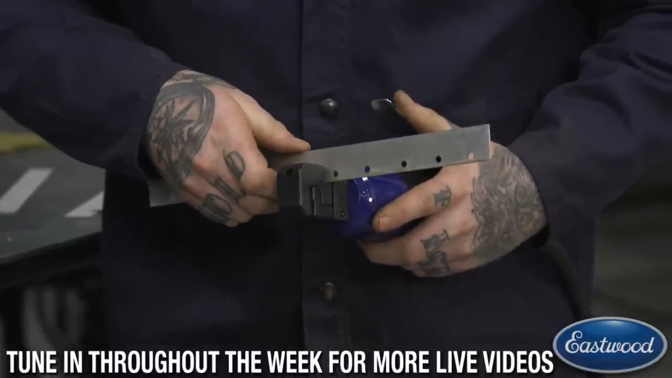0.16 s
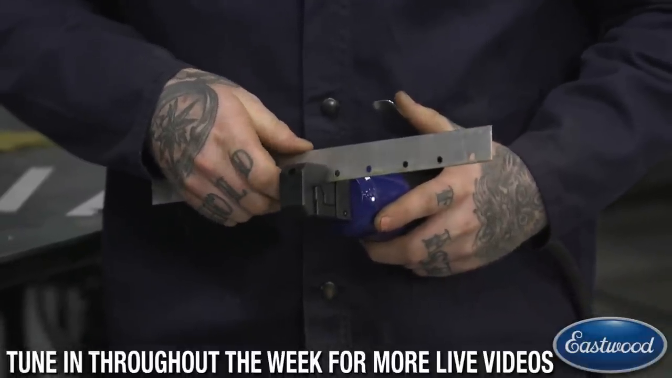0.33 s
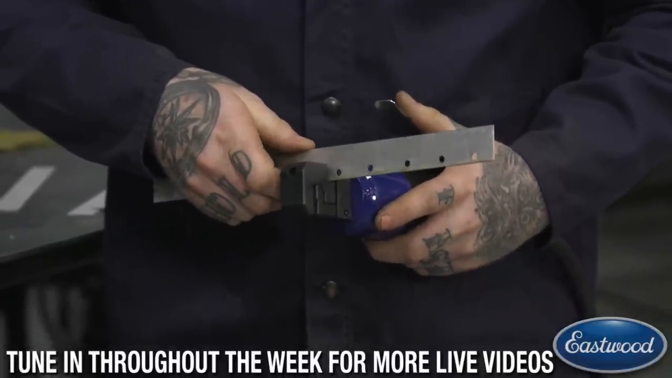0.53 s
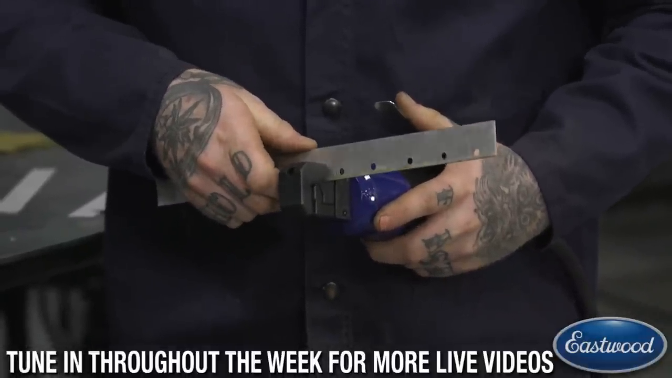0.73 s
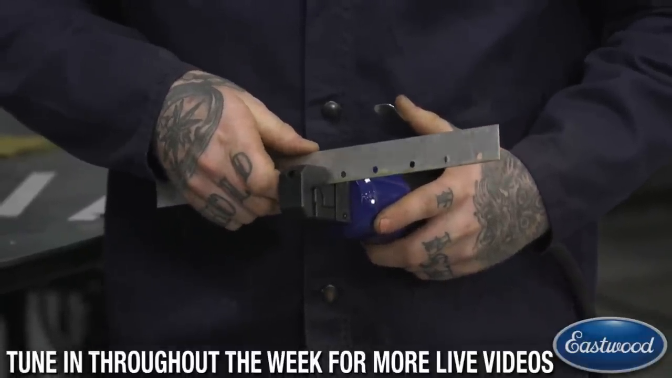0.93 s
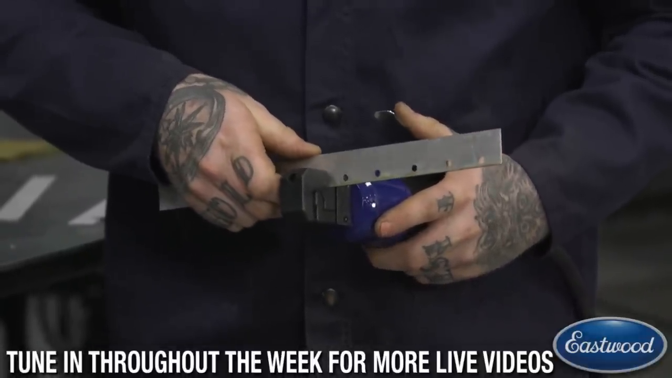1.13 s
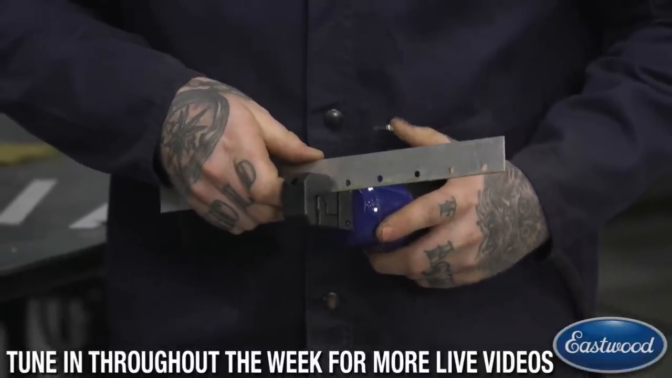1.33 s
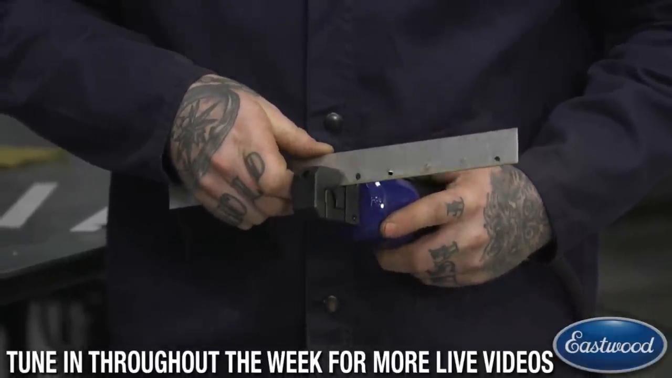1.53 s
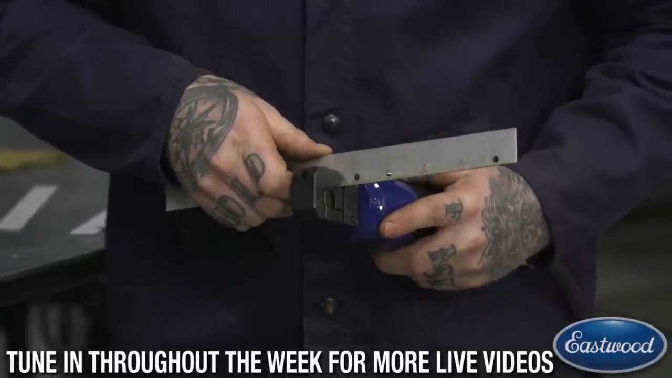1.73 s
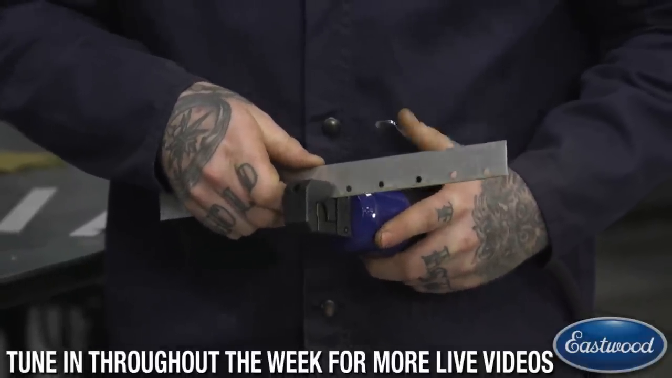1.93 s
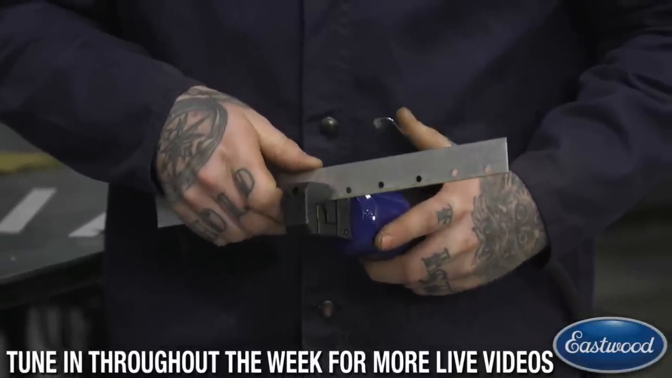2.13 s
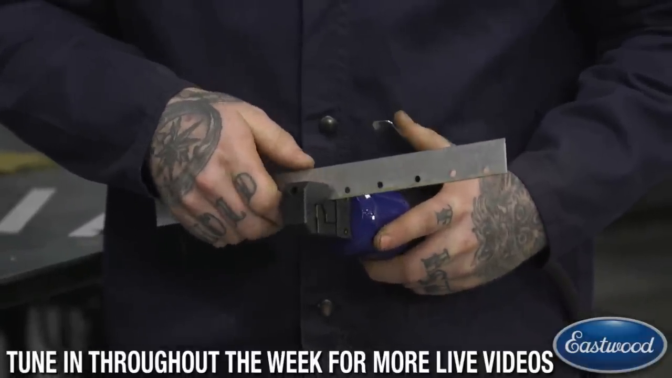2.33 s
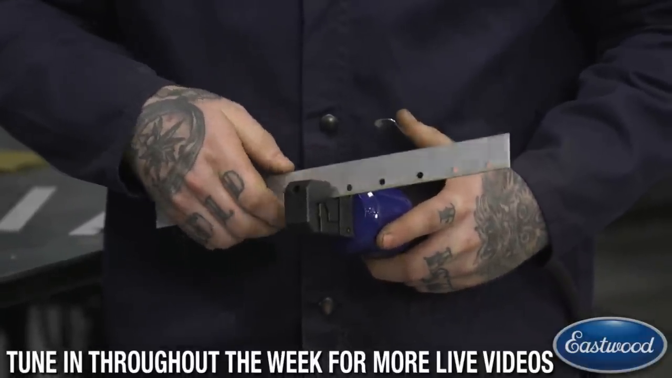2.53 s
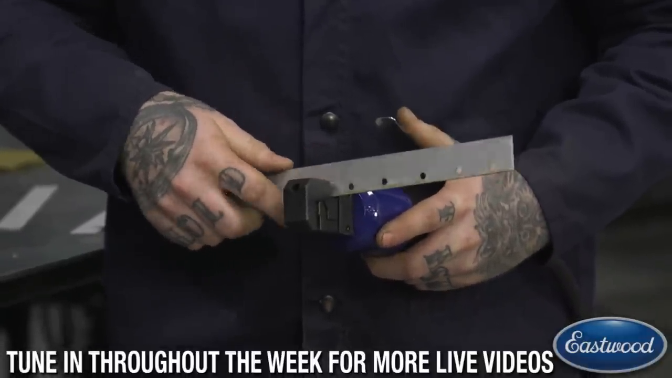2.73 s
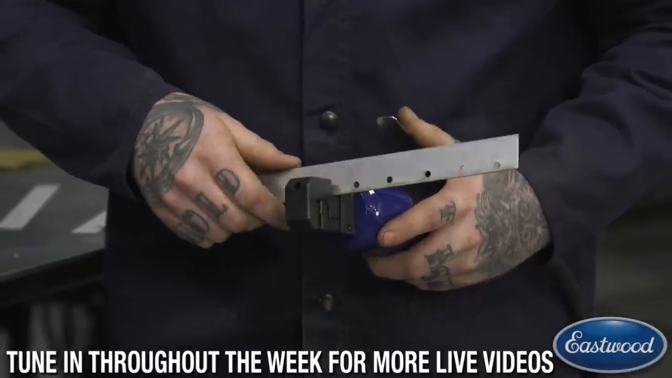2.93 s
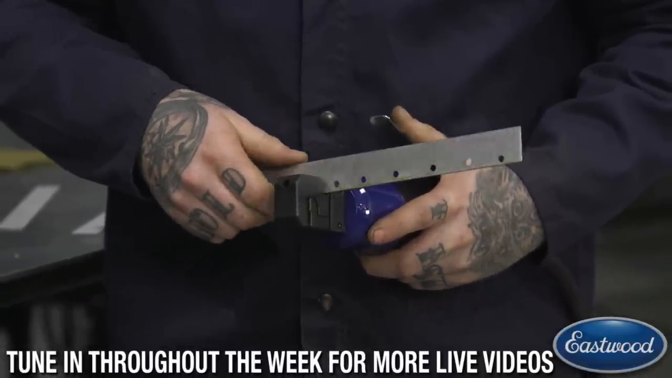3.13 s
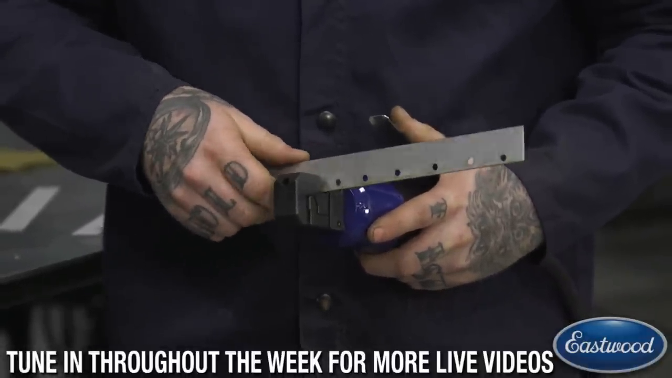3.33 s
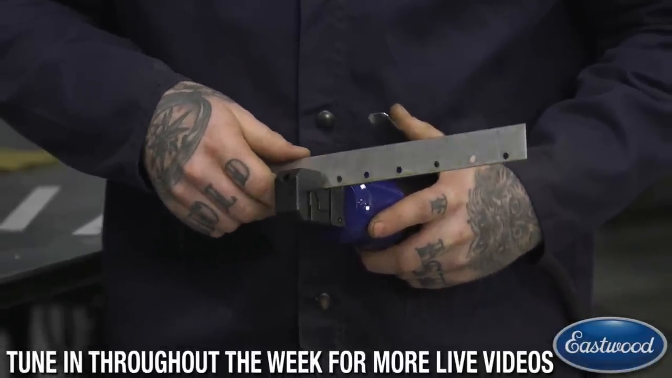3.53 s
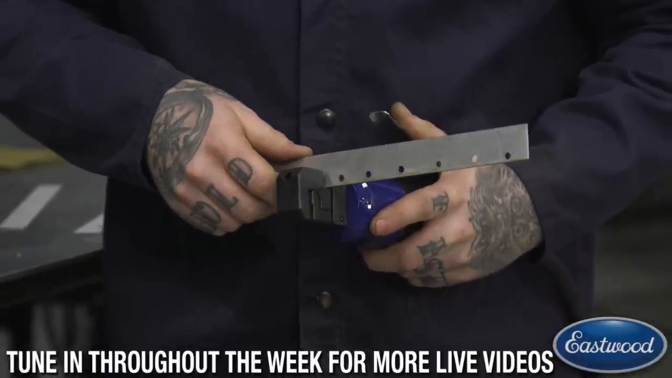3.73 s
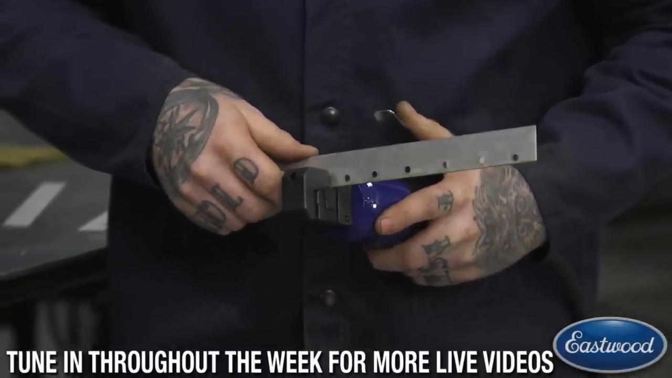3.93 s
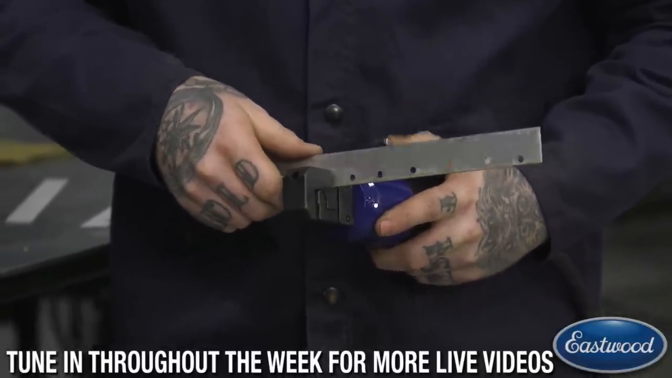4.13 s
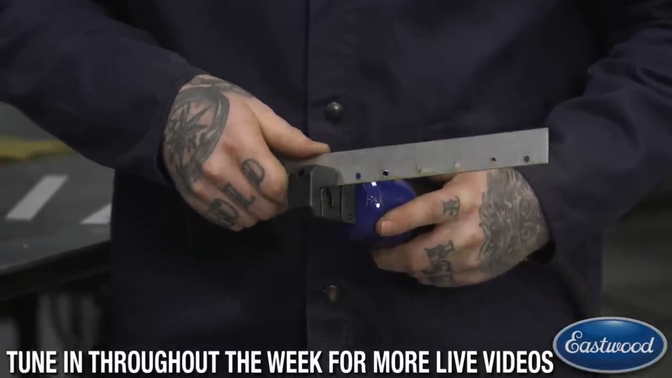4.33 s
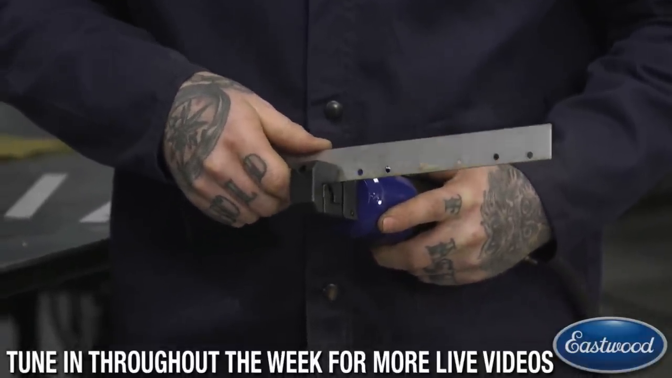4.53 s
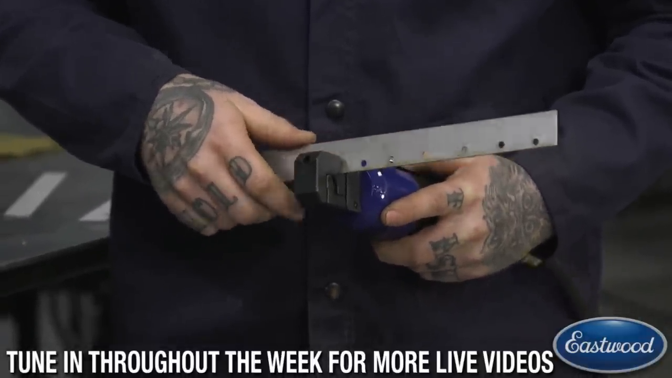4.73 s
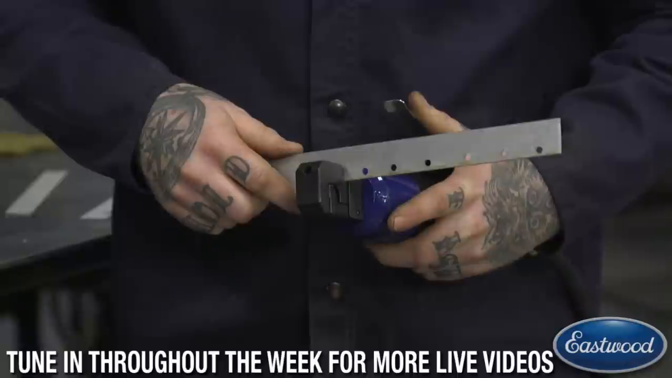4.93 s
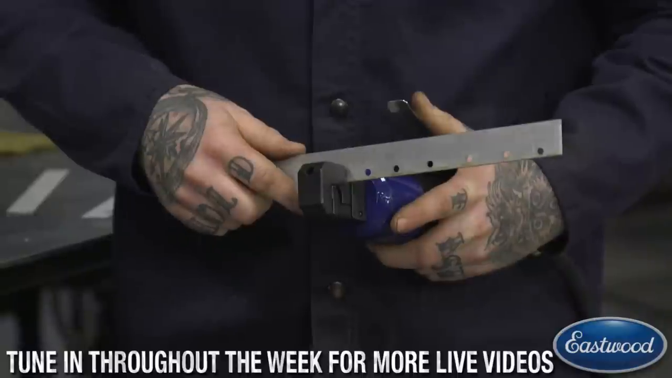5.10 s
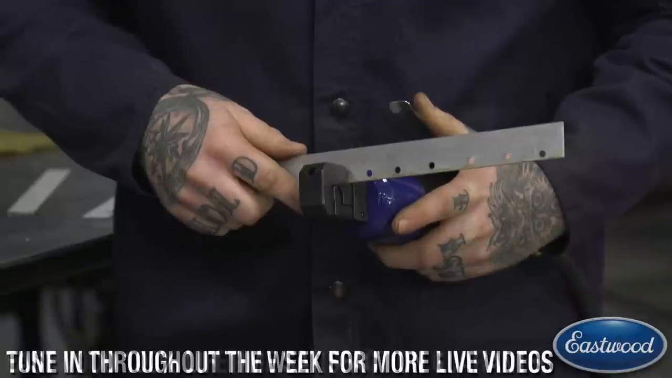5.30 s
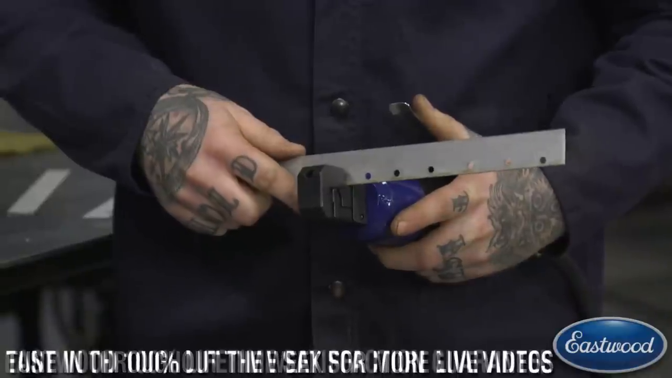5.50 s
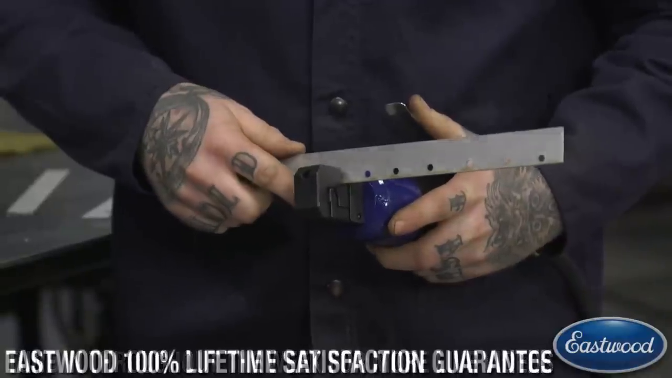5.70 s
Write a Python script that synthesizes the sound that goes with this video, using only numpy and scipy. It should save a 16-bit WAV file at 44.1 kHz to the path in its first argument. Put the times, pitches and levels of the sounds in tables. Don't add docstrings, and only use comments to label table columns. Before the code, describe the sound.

A quiet shop hums at first. A hand-held air punch chatters and cracks through steel, then releases a sharp blast of air that thins into a whistling hiss. Small tinny clicks follow as the metal strip is moved. A second rush and snap comes, faint trigger squeaks, another blow-off, and a last tiny tick, all heard close, with faint room reflections.

```python
import sys
import numpy as np
from scipy import signal
from scipy.fft import rfft, irfft, next_fast_len
from scipy.io import wavfile
from scipy.ndimage import map_coordinates

SR = 44100
rng = np.random.default_rng(int(sys.argv[2]) if len(sys.argv) > 2 else 0)


def inscribe(sig):
    pcm = np.round(np.clip(np.atleast_2d(sig).T, -1, 1) * 32767)
    wavfile.write(sys.argv[1], SR, pcm.astype(np.int16))


def magnitude_from_level(level_db):
    exponent = np.asarray(level_db, float) / 20
    return 10 ** exponent


N = 254012


def since(s):
    return np.arange(N) / SR - s


def past(t, knee_s):
    return knee_s * np.logaddexp(0, t / knee_s)


def unit(x):
    return x / np.sqrt(np.mean(x ** 2) + 1e-20)


def along(points, hz):
    f, v = np.transpose(points)
    return np.interp(np.log(hz + 1), np.log(f + 1), v)


def wobble(rate):
    knots = rng.standard_normal(int(N * rate / SR) + 4)
    return map_coordinates(knots, [np.arange(N) * rate / SR])


def filtered(x, response):
    m = next_fast_len(N + SR // 2)
    return irfft(rfft(x, m) * response(np.fft.rfftfreq(m, 1 / SR)), m)[..., :N]


def resonances(modes):
    def response(f):
        total = 0
        for k, (centre, width, db) in enumerate(modes):
            total = total + (-1) ** k * magnitude_from_level(db) * 1j * f * width / (centre * centre - f * f + 1j * f * width)
        return total
    return response


def air(spectrum, eddy_db):
    eddies = magnitude_from_level(eddy_db * (wobble(300) + wobble(1500)))
    return unit(filtered(eddies * rng.standard_normal(N), lambda hz: magnitude_from_level(along(spectrum, hz))))


def bursts(events, crack):
    out, t = np.zeros((2, N + SR)), np.arange(SR // 5) / SR
    for s, db, second_db, t60 in events:
        wake = magnitude_from_level(-60 * t / max(t60, .002)) * rng.standard_normal((2, len(t)))
        wake[:, 0] = 1.5
        sharp_start = 1 + crack * magnitude_from_level(-60 * t / .0015)
        level = magnitude_from_level(db + np.array([[0], [second_db]]))
        out[:, round(s * SR):][:, :len(t)] += level * sharp_start * wake
    return out[:, :N]


# f/Hz, level/dB per Hz
VENTILATION = [(12, -40.5), (20, -11.5), (145, -12), (270, -2.5), (307, -5), (337, -1), (362, -18),
               (390, -7), (523, -12.5), (652, -6), (940, -13.5), (1170, -13.5), (1600, -32.5),
               (2080, -57.5), (3520, -120)]
# f/Hz, level/dB per Hz
AIR_LINES = [(1000, -28.5), (1400, -2.5), (1600, -4.5), (2250, -2.5), (2600, -7), (3100, -7), (3700, -4),
             (4700, -6.5), (5600, -13), (7300, -15.5), (9500, -17.5), (11000, -15.5), (12200, -20),
             (15700, -30.5)]
# f/Hz, level/dB rms
FAN_MOTOR = [(333.8, -63.5), (667.5, -62.5), (1001, -68), (1147, -68.5), (1335, -76.5), (1669, -82.5)]
VENTILATION_DB, AIR_LINES_DB = -54 - 2.0, -67


def shop():
    t = since(0)
    motor = np.zeros(N)
    for hz, db in FAN_MOTOR:
        level = magnitude_from_level(db + 3 + 0.35 * wobble(12))
        motor += level * np.sin(2 * np.pi * hz * t + .15 * wobble(8.1))
    rumble = magnitude_from_level(VENTILATION_DB + 0.8 * wobble(3)) * air(VENTILATION, eddy_db=0.0)
    far_hiss = magnitude_from_level(AIR_LINES_DB + 0.34 * wobble(2.5)) * air(AIR_LINES, eddy_db=0.25)
    return rumble + far_hiss + motor


# f/Hz, t60/s
ROOM_DECAY = [(200, 0.403), (2000, 0.57), (8000, 0.31), (16000, 0.23)]


def walls(x):
    hz, t, z = signal.stft(rng.standard_normal(SR // 2), SR, nperseg=256)
    decay = magnitude_from_level(-60 * t / along(ROOM_DECAY, hz)[:, None])
    tail = signal.istft(z * decay, SR, nperseg=256)[1]
    return signal.fftconvolve(np.pad(x, (400, 0)), tail / np.linalg.norm(tail))[:N]


# t/s, peak level/dB, crack above ring/dB, t60/s
STRIP_TICKS = [
    (2.438, -46, 1, .06),
    (2.4435, -46, -6, 0.057),
    (2.449, -47, 2, 0.035),
    (2.563, -54.5, 1, .035),
    (2.76, -72, 8, .02),
    (2.985, -66, 8, 0.022),
    (3.4176, -63, 12.5, .03),
    (5.53, -60, 16, 0.0182),
]
# f/Hz, width/Hz, level/dB
LOOSE_STRIP = [(2040, 270, -1.5), (4810, 110, -9), (6680, 160, -4), (7495, 90, -1), (9500, 170, -5),
               (10560, 130, -1), (12800, 310, -5), (13800, 120, -5), (14900, 130, -13)]
# f/Hz, width/Hz, level/dB
LIGHT_CONTACT = [(3820, 1400, 0.5), (8000, 4000, -2), (12500, 3000, -12)]
# t/s, length/s, f/Hz, level/dB
TRIGGER_SQUEAKS = [
    (4.62, 0.0543, 8000, -76),
    (4.645, .045, 9254, -78.5),
    (4.662, .03, 13570, -86),
    (4.68, .045, 8650, -78),
    (4.721, .04, 13550, -85),
]


def handling():
    ring, crack = bursts(STRIP_TICKS, crack=1.3)
    tinks = magnitude_from_level(7.0) * filtered(ring, resonances(LOOSE_STRIP))
    out = tinks + magnitude_from_level(-4) * filtered(crack, resonances(LIGHT_CONTACT))
    t, waver_db, drift = since(0), 3 * wobble(60), .8 * wobble(120)
    for s, length, hz, db in TRIGGER_SQUEAKS:
        swell = np.sin(np.pi * np.clip((t - s) / length, 0, 1))
        out = out + magnitude_from_level(db + waver_db) * swell * np.sin(2 * np.pi * hz * t + drift)
    return out


# port opens t/s, peak level/dB, hold/s, choked until/s, seep level/dB
BLOW_OFFS = [
    (1.865, -13, 0.0058, 0.14, -52),
    (4.8198, -15.5, 0.0234, 0.14, -56),
]
# f/Hz, width/Hz, level/dB
PORT_FLOWING = [(2170, 316, -1.5), (4200, 680, -3.5)]
# f/Hz, width/Hz, level/dB
PORT_NEARLY_EMPTY = [(2200, 240, 2), (4380, 506, 0)]
# f/Hz, width/Hz, level/dB
MUFFLER_MODES = [(3720, 1700, -2.5), (5660, 1160, 2), (7240, 1140, 1), (9860, 1460, -1),
                 (12040, 1520, -3.5), (15100, 820, -6.5)]
# f/Hz, width/Hz, level/dB
FLAP_GAP = [(12420, 1320, 0), (7920, 500, -3.5)]
GAP_DB, GAP_FADE_DB_S = -12, 85
SEEP_FROM_S, SEEP_PEAK_S, SEEP_RISE_DB_S, SEEP_FADE_DB_S = .165, 0.24, 50, 48
HISS_DB, HISS_SAG_DB_S, SHUT_S, SHUT_LASTS_S, SHUT_DB = -53, 54, .32, 0.073, -8


def seep():
    breath = rng.standard_normal((2, N))
    whistle, hiss, gap = np.zeros((3, N))
    for s, *_, seep_db in BLOW_OFFS:
        t = since(s + SEEP_PEAK_S)
        flowing = t >= SEEP_FROM_S - SEEP_PEAK_S
        whistle += magnitude_from_level(seep_db + np.where(t < 0, SEEP_RISE_DB_S, -SEEP_FADE_DB_S) * t) * flowing
        spare_db = seep_db - HISS_DB
        shut = np.clip((since(s) - SHUT_S) / SHUT_LASTS_S, 0, 1)
        hiss += magnitude_from_level(HISS_DB - HISS_SAG_DB_S * np.abs(t) + (SHUT_DB + spare_db) * shut) * flowing
        gap += magnitude_from_level(seep_db + spare_db + GAP_DB - GAP_FADE_DB_S * t) * flowing

    def sung(noise, modes, sharpness):
        return unit(filtered(noise, lambda f: resonances(modes)(f) ** sharpness))

    late = np.clip((-54 - 20 * np.log10(whistle + 1e-9)) / 9, 0, 1)
    port = (1 - late) * sung(breath[0], PORT_FLOWING, 1.6) + late * sung(breath[0], PORT_NEARLY_EMPTY, 1.6)
    gap_air = gap * sung(breath[0], FLAP_GAP, 2)
    return whistle * port + gap_air + hiss * sung(breath[1], MUFFLER_MODES, 2)


# f/Hz, level/dB per Hz
INLET_HISS = [(710, -38), (1200, -16.5), (2130, -2), (2730, -10), (4410, -6.5), (6370, -7), (7100, 0.5),
              (7740, -5), (10600, -1), (16000, -15)]
# f/Hz, level/dB per Hz
BODY_ROAR = [(15, -46.5), (25, -11.5), (195, -1.5), (338, -5.5), (769, -3), (1030, -12), (1120, -5),
             (1500, -12.5), (1950, -38), (3300, -120)]
# f/Hz, level/dB per Hz
FULL_CYLINDER_HISS = [(470, -34.5), (800, -2), (1300, -4), (1530, -11), (1750, -3.5), (2310, -5),
                      (2490, 0.5), (2710, -4), (3660, -4.5), (5250, -7), (7160, -4.5), (9540, -7.5),
                      (13700, -13.5), (15700, -21)]
# valve opens t/s, slug shears t/s, air level/dB, steel level/dB, strip tuning/ratio
PUNCH_STROKES = [
    (1.3635, 1.392, -26, -14.5, 1.0),
    (4.1198, 4.149, -27.5, -13.5, 1.015),
]
# t/s after the valve opens, level/dB
INLET_FLOW = [
    (0, -11),
    (.0035, -1.5),
    (.0145, 1),
    (.0205, -5.5),
    (.0375, -3),
    (.041, -14.5),
]
BUFFET_DB, BUFFET_FADE_DB_S, FILL_FADE_DB_S = -12, 600, 1500
SETTLE_DB, SETTLE_FADE_DB_S = -14.5, 155


def inlet():
    hiss, buffet, settle = np.zeros((3, N))
    when, flow_db = np.transpose(INLET_FLOW)
    for opens, _, air_db, _, _ in PUNCH_STROKES:
        t = since(opens)
        full = np.clip(t - when[-1], 0, None)
        hiss += magnitude_from_level(air_db + np.interp(t, when, flow_db) - FILL_FADE_DB_S * full) * (t >= 0)
        buffet += magnitude_from_level(air_db + BUFFET_DB - BUFFET_FADE_DB_S * full) * (t >= 0)
        settle += magnitude_from_level(air_db + SETTLE_DB - SETTLE_FADE_DB_S * full) * (t >= when[-2])
    moving = hiss * air(INLET_HISS, eddy_db=2.5) + buffet * air(BODY_ROAR, eddy_db=3)
    return moving + settle * air(FULL_CYLINDER_HISS, eddy_db=1.1)


# f/Hz, level/dB per Hz
VALVE_LEAK = [(2350, -47), (4000, -18.5), (6070, 0), (10100, -3), (13800, -11.5), (15100, -6.5),
              (16000, -17.5)]
# f/Hz, level/dB per Hz
EXHAUST_JET = [(590, -36), (1000, -8.5), (1260, -7.5), (1690, -5), (2490, 0), (2990, -5.5), (3890, -0.5),
               (5090, -4), (5850, 0.5), (6330, -2.5), (8000, -1), (10400, -31.5), (17600, -120)]
# f/Hz, level/dB per Hz
JET_TREBLE = [(4710, -34), (8000, -6), (9450, -2), (10200, 1.5), (11500, -6), (13000, -3), (14000, -8.5),
              (15700, -13.5)]
# peak t/s, level/dB, swell/dB a second
VALVE_SPURTS = [
    (1.834, -60.5, 1500),
    (1.849, -52, 800),
    (4.778, -59.5, 2500),
    (4.796, -51.5, 2498),
]
SPURT_STOP_DB_S, SPURT_LASTS_S = 1800, 0.0044
CRACK_DB, SLIT_DB, SLIT_S, LIFT_S, OPEN_S = -32, -16.5, .006, .010, .029
CHOKED_DB_S, FREE_DB_S, KNEE_S = 104.5, 330, 0.01195
ROAR_DB, ROAR_HOLD_S, ROAR_FADE_DB_S, ROAR_LEAST_DB = -8.5, .08, 171, -22
TREBLE_DB, TREBLE_GROWS = -2, .8


def exhaust():
    leak, jet, treble, roar = np.zeros((4, N))
    for s, db, swell_db in VALVE_SPURTS:
        t = since(s)
        leak += magnitude_from_level(db + np.where(t < 0, swell_db, -SPURT_STOP_DB_S) * t) * (t < SPURT_LASTS_S)
    for s, db, hold_s, choked_s, _ in BLOW_OFFS:
        t = since(s)
        slit = magnitude_from_level(SLIT_DB) * np.clip(t / SLIT_S, 0, 1)
        lift = np.clip((t - LIFT_S) / (OPEN_S - LIFT_S), 0, 1)
        area = magnitude_from_level(CRACK_DB) + slit + lift
        opening_db = 20 * np.log10(area / area[-1])
        choked_db = opening_db - CHOKED_DB_S * np.clip(t - OPEN_S - hold_s, 0, None)
        rest = magnitude_from_level(db - FREE_DB_S * past(t - choked_s, KNEE_S)) * (t >= 0)
        roar_db = np.clip(ROAR_DB - ROAR_FADE_DB_S * (t - ROAR_HOLD_S), ROAR_LEAST_DB, ROAR_DB)
        jet += rest * magnitude_from_level(choked_db)
        treble += rest * magnitude_from_level(TREBLE_DB + TREBLE_GROWS * choked_db)
        roar += rest * magnitude_from_level(choked_db + roar_db)
    blast = jet * air(EXHAUST_JET, eddy_db=0.67) + treble * air(JET_TREBLE, eddy_db=0.2)
    return leak * air(VALVE_LEAK, eddy_db=2.1) + blast + roar * air(BODY_ROAR, eddy_db=1.05)


# t/s after the shear, level/dB, f/Hz, t60/s
BODY_RINGS = [(-.0286, -17, 240, 0.019), (-.0216, -22, 220, 0.015), (-.0148, -9, 6950, .015),
              (-.0059, -14, 6500, .018), (0, -16, 1100, 0.021), (0, 4, 2520, 0.0023),
              (.0005, -10.5, 2330, .028), (.001, -31, 2520, 0.18), (.0005, -14, 3100, 0.029),
              (.001, -24, 3485, .17), (.009, -26, 7400, .07), (0.0138, -8, 296, 0.0094),
              (0.0253, -11.5, 530, .027), (.032, -36, 12, .3), (.044, -33, 9400, 0.073)]
# t/s, peak level/dB, f/Hz, t60/s
BLAST_JOLT = (4.844, -24, 120, .066)


def thuds():
    out, t = np.zeros(N + SR), np.arange(SR // 3) / SR
    rings = [BLAST_JOLT]
    for _, shear, _, steel_db, tuning in PUNCH_STROKES:
        rings += [(shear + s, steel_db + db, hz * tuning, t60) for s, db, hz, t60 in BODY_RINGS]
    for s, db, hz, t60 in rings:
        out[round(s * SR):][:len(t)] -= magnitude_from_level(db - 60 * t / t60) * np.sin(2 * np.pi * hz * t)
    return out[:N]


# t/s after the shear, level/dB, treble above it/dB, t60/s
STEEL_CONTACTS = [
    (-.0148, -9.5, -2.5, 0.012),
    (-.0059, -9, 4, .013),
    (0, -2.5, -9, .011),
    (.0016, -3, -8, .02),
    (.0078, -14, -3, .01),
    (.0251, -21, -12, 0.011),
    (.044, -28, 3, .05),
]
# t/s, peak level/dB, treble above peak/dB, t60/s
TRIGGER_PRESS = (4.112, -48, -5, .018)
# f/Hz, width/Hz, level/dB
JAW_MODES = [(1103, 500, -5.5), (2343, 290, -0.5), (3590, 350, 0.5), (4696, 520, -2), (6000, 770, -14.5)]
# f/Hz, width/Hz, level/dB
CLAMPED_STRIP = [(7320, 500, -2.5), (9300, 890, -3), (10360, 600, -0.5), (13900, 900, -7),
                 (15300, 700, -16.5)]


def steel():
    snaps = [TRIGGER_PRESS]
    for _, shear, _, steel_db, _ in PUNCH_STROKES:
        snaps += [(shear + s, steel_db + db, treble_db, t60) for s, db, treble_db, t60 in STEEL_CONTACTS]
    low, high = bursts(snaps, crack=3.6)
    jaw = filtered(low, lambda f: resonances(JAW_MODES)(f) + magnitude_from_level(-14) * f / (f + 1500))
    strip = filtered(high, lambda f: resonances(CLAMPED_STRIP)(f) + magnitude_from_level(-37) * f / (f + 4000))
    return magnitude_from_level(4) * jaw + magnitude_from_level(2.5) * strip


def scene():
    stroke = inlet() + steel() + handling()
    blow = exhaust()
    echo = magnitude_from_level(-23.5) * walls(stroke) + magnitude_from_level(-23.5) * walls(blow)
    return (shop() + echo + seep() + thuds() + blow + stroke)[None]


def top_cut(x):
    return signal.sosfilt(signal.butter(12, 16830, fs=SR, output="sos"), x)


CEILING, TOP_HZ = .62, 15770


def record(dry):
    rounded = dry / (1 + np.abs(dry / CEILING) ** 4) ** (1 / 4)
    mix = filtered(rounded, lambda hz: 1 / (1 + (hz / TOP_HZ) ** 200))
    return top_cut(mix)


dry = scene()
out = record(dry)
inscribe(out)
```